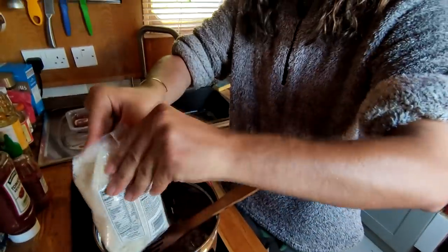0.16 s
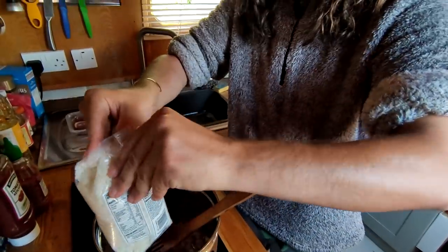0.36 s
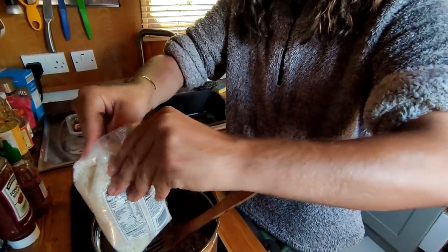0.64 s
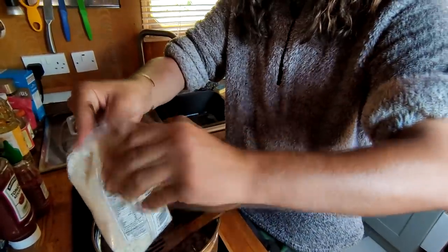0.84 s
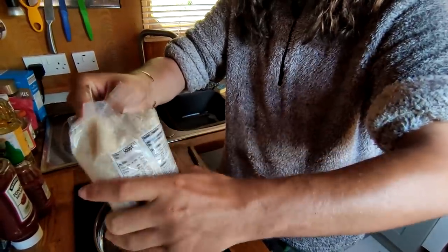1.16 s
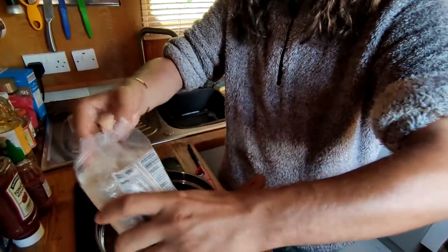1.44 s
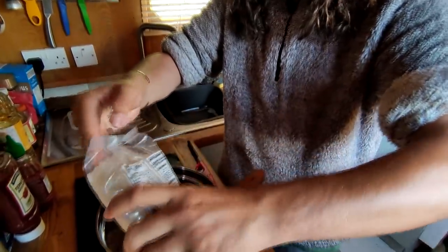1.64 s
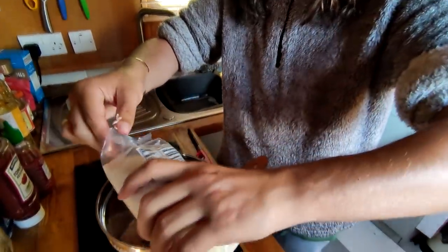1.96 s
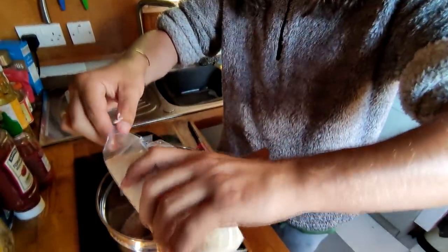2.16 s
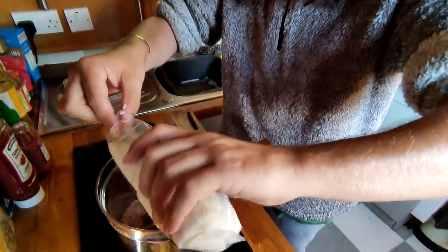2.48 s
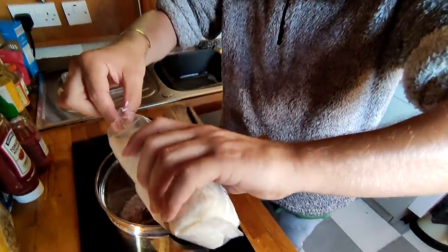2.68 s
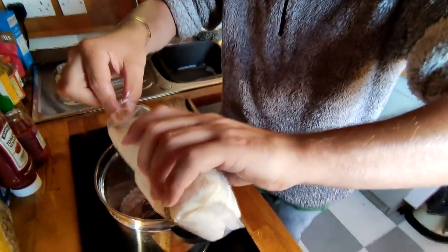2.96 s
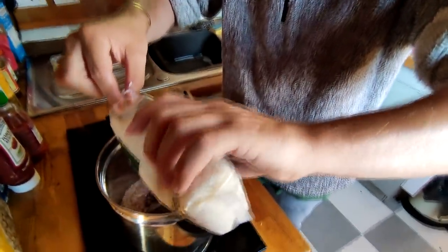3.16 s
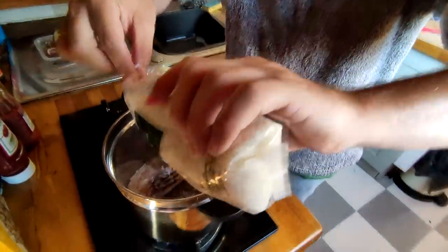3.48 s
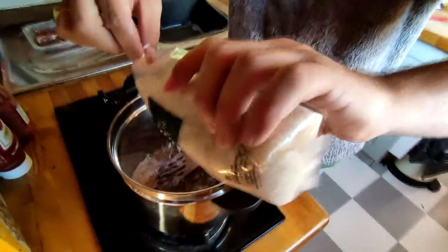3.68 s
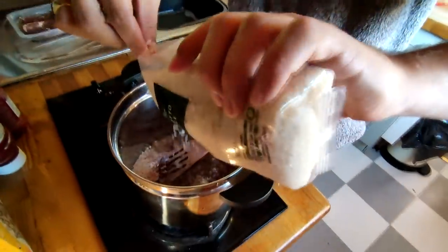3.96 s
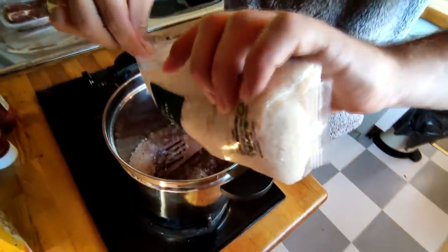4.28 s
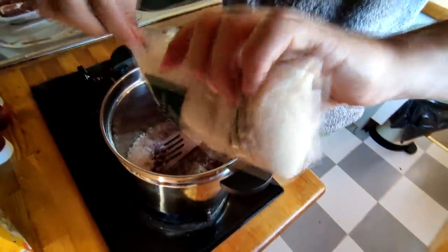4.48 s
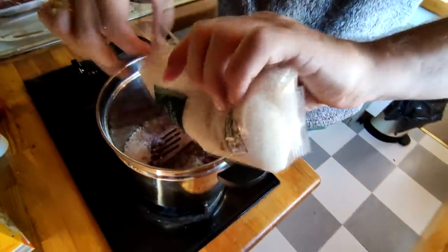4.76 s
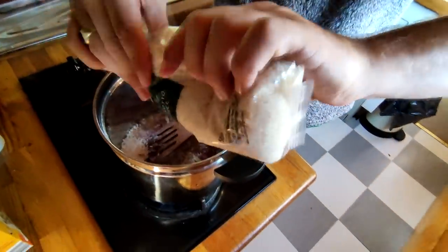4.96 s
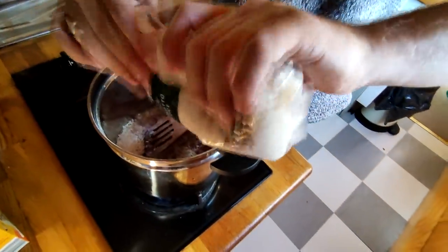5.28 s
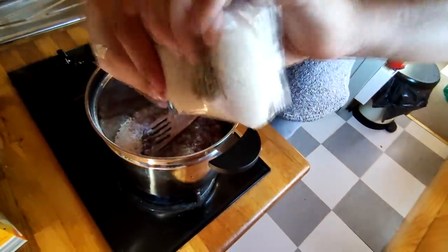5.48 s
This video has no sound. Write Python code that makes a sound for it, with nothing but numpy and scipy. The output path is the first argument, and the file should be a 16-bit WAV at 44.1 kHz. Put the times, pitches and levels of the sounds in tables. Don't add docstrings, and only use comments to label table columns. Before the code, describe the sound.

Dry rice is shaken from a crackling plastic bag into a ringing steel pot, pattering brightly over soft frying sizzle and extractor hum.

```python
import sys
import numpy as np
from scipy import signal
from scipy.fft import rfft, irfft
from scipy.io import wavfile
from scipy.ndimage import uniform_filter1d

SR = 44100
rng = np.random.default_rng(int(sys.argv[2]) if len(sys.argv) > 2 else 0)


def digitize_waveform(pressure):
    field = np.atleast_2d(pressure).T
    bounded = np.clip(field, -1, 1)
    quanta = np.round(bounded * 32767).astype(np.int16)
    wavfile.write(sys.argv[1], SR, quanta)


def invert_db(level):
    return 10 ** (np.asarray(level, dtype=float) / 20)


N = 247842

# frequency in Hz, level in dB per Hz.
KITCHEN_COLOUR = [(15, -56), (25, -15), (101, -4), (400, -3), (633, -12), (1540, -1), (3020, -3),
                  (3450, -10), (4640, -2), (5610, -43), (8170, -9.5), (11900, -2.5), (15600, -7.5)]
# frequency in Hz, likeness (1 is identical).
PORT_LIKENESS = [(60, 0.85), (180, 0.76), (550, 0.68), (1650, 0.44), (4970, -0.059), (15000, -0.2)]
# frequency in Hz, left in dB, right in dB.
PORT_SHADING = [(300, -1, 1), (1300, 1, -1), (2500, 1, -2), (4600, 5, 1), (6600, 7, -1), (7200, 0, -5),
                (8600, 8, 0), (9300, -3, -4), (9800, -3, 3), (10600, -9, 5), (11300, -10, 6),
                (11750, -2, 9), (14000, -5, 5), (15500, -4, 3)]
# start in seconds, peak in dB, pitch in Hz.
THUMPS = [(0.356, -25, 385), (1.183, -41, 380), (1.287, -30, 382), (1.68, -30.5, 410), (1.905, -32, 387),
          (3.169, -36.5, 358), (3.388, -34, 384), (3.516, -27, 368), (3.993, -35.5, 248), (4.72, -29, 238),
          (4.856, -25.5, 270), (5.111, -25, 390), (5.197, -22.5, 310), (5.348, -20, 362),
          (5.467, -25.5, 297), (5.494, -36, 228), (5.565, -21.5, 370)]
# frequency in Hz, level in dB per Hz.
FILM_COLOUR = [(100, -13.5), (330, -5), (520, -3), (1000, 3), (2500, -2), (4500, -6.5), (6000, -10.5),
               (10000, -29), (16000, -23)]
# time in seconds, rustle in dB.
HANDLING = [
    (0.0, -46),
    (0.43, -68),
    (0.93, -59),
    (1.42, -43),
    (1.54, -52.5),
    (1.96, -50),
    (2.61, -52),
    (3.41, -50),
    (4.03, -51.5),
]
# start in seconds, length in seconds, rustle in dB.
SQUEEZES = [
    (4.474, 0.11, -27.5),
    (4.644, 0.23, -37.5),
    (4.954, .25, -31),
    (5.273, 0.085, -29.5),
    (5.426, .2, -30.5),
]
# start in seconds, peak in dB, film pitch in Hz, crack in dB.
SHAKEN_CREASES = [(0.0362, -14.5, 3280, -29), (0.1628, -32, 1800, -9), (0.1963, -27, 1810, -5.5),
                  (0.2859, -37, 3040, 7), (0.327, -21, 1650, -22), (0.3563, -18.5, 1050, -19),
                  (0.382, -24, 1610, -25), (0.515, -27.5, 1290, -19), (0.6197, -25, 1930, -22),
                  (0.6572, -13, 1450, -11), (0.6646, -25.5, 1520, -23), (0.7909, -26.5, 2100, 0),
                  (0.8353, -28, 1630, -25), (0.9009, -24.5, 1300, -8), (1.184, -26, 383, -25),
                  (1.2053, -24.5, 980, 3), (1.238, -26, 960, -20), (1.2863, -18, 1400, -9),
                  (1.442, -15.5, 1230, -15), (1.5563, -22, 2700, -22), (1.5629, -24, 1430, -12),
                  (1.6803, -26.5, 960, -19), (1.7954, -39, 3070, -25), (2.1647, -26.5, 2190, -19),
                  (2.2635, -24, 3300, -15), (3.3766, -12.5, 3600, -6), (4.0998, -14, 3120, -21),
                  (4.3766, -21, 1540, -25)]
# start in seconds, peak in dB, film pitch in Hz, crack in dB.
SQUEEZED_CREASES = [(4.5887, -17, 1850, -2), (4.655, -24.5, 1910, -25), (4.691, -15, 3440, -9),
                    (4.722, -28, 1240, -23), (4.797, -26.5, 1590, 2), (4.829, -17.5, 2080, -16),
                    (4.9873, -22, 1330, -28), (4.9988, -18.5, 1870, -2), (5.03, -22, 2400, -5),
                    (5.0621, -4.5, 2080, -20), (5.0932, -25, 1950, -7), (5.1088, -7, 1130, -10),
                    (5.1343, -24, 645, -16), (5.158, -9.5, 2200, -5.5), (5.196, -17.5, 770, -34),
                    (5.219, -32.5, 1400, 17), (5.2884, -17, 1240, -31), (5.294, -16, 2200, -22),
                    (5.3096, -32, 2210, 1), (5.319, -23, 1750, -29), (5.3301, -8.5, 3360, -4),
                    (5.3941, -19, 1360, -10), (5.435, -13.5, 2440, -19), (5.469, -18, 820, -3),
                    (5.4955, -7, 2300, -12), (5.534, -15, 2400, -1), (5.5645, -14.5, 1570, 1),
                    (5.587, -22.5, 1520, 0)]
# time in seconds, patter in dB, left over right in dB.
POUR = [(0.0, -46.5, 5), (0.3, -48.5, 0.5), (0.47, -38.5, 2.5), (1.36, -40.5, 1.5), (1.83, -45.5, 0.5),
        (2.02, -46, -5), (2.25, -37.5, -0.5), (2.5, -42.5, 0), (2.8, -33, 1.5), (3.05, -30, -3),
        (3.22, -36, -1.5), (3.46, -33.5, -3.5), (3.77, -29.5, -0.5), (4.36, -33, -1), (4.44, -31.5, -1),
        (4.62, -49.5, 4.5), (4.91, -40.5, -1.5), (5.62, -38.5, -1)]
# start in seconds, peak in dB, dying time in seconds.
SHAKES = [(0.1042, -26, 0.063), (0.33, -11.5, 0.068), (0.3463, -10, 0.12), (0.45, -16, .067),
          (0.529, -13, 0.083), (0.5756, -10.5, 0.13), (0.7817, -14.5, 0.15), (0.8984, -19, .04),
          (0.908, -7, 0.039), (0.924, -11, 0.13), (1.0051, -13, 0.12), (1.1528, -23, .055),
          (1.1714, -16.5, 0.19), (1.1973, -20.5, 0.21), (1.257, -11.5, 0.11), (1.319, -11.5, 0.038),
          (1.3344, -13, 0.13), (1.4632, -15.5, 0.15), (1.605, -17.5, 0.076), (1.713, -19.5, 0.053),
          (1.7225, -17, 0.28), (1.941, -24.5, .06), (2.0743, -22.5, 0.33), (2.1124, -22.5, 0.27),
          (2.133, -20.5, 0.3), (2.1829, -11.5, .094), (2.305, -21, .06), (2.339, -15.5, 0.031),
          (2.3765, -20, 0.35), (2.4252, -18.5, .06)]
# start in seconds, peak in dB, dying time in seconds.
SURGES = [(2.5505, -18.5, 0.39), (2.5777, -15.5, 0.26), (2.628, -13.5, 0.27), (2.6554, -16, 0.4),
          (2.7422, -16.5, 0.15), (2.7944, -14.5, 0.049), (2.8985, -15.5, .066), (2.9283, -17, 0.026),
          (2.98, -15.5, 0.12), (3.0037, -13, 0.057), (3.0998, -16, 0.15), (3.1706, -12.5, 0.048),
          (3.2195, -15.5, 0.063), (3.3154, -18, 0.23), (3.531, -17, 0.056), (3.6017, -13.5, .067),
          (3.633, -13, 0.31), (3.767, -11.5, 0.051), (3.7984, -12.5, 0.15), (3.8447, -11.5, 0.059),
          (3.908, -13, .03), (4.0193, -19, 0.07), (4.0687, -13.5, 0.38), (4.1177, -11.5, 0.12),
          (4.19, -9, 0.073), (4.274, -22, 0.066), (4.34, -15, 0.061), (4.428, -16, 0.083),
          (4.4964, -13, .12), (4.6104, -20, 0.1)]
# time in seconds, peak in dB.
TICKS = [(0.023, -30), (0.16, -28), (0.227, -30), (0.2373, -22), (0.2524, -24), (0.285, -26), (0.2935, -29),
         (0.494, -21.5), (0.5474, -28), (0.6755, -40), (0.684, -34), (0.7332, -27), (0.7714, -29),
         (0.873, -21), (0.8875, -19), (1.1186, -43), (1.1348, -36), (1.2401, -21), (1.4421, -41),
         (1.5787, -24), (1.6568, -25), (1.778, -22), (1.9813, -18), (2.0238, -39), (3.3777, -38),
         (3.4967, -19), (4.5374, -16.5), (4.67, -29), (5.1, -31)]
# frequency in Hz, level in dB per Hz.
PATTER_COLOUR = [(700, -17), (1500, -15.5), (3500, -7.5), (4600, -9.5), (6000, -6), (7600, 1),
                 (10000, -2.5), (13000, -6.5), (16000, -7.5)]
# frequency in Hz, width in Hz, level in dB above the patter.
POT_MODES = [(2088, 135, 4.8), (3380, 49, 3.4), (3811, 214, 4.4), (4511, 104, 5.2), (4791, 45, 5.1),
             (5243, 116, 5.8), (5340, 29, 3.9), (5544, 94, 6.6), (6556, 24, 5.1), (6642, 165, 6.2),
             (7073, 50, 3.5), (7375, 110, 3.6), (8344, 120, 3.4), (8613, 89, 5.1), (9011, 143, 5.7),
             (10303, 81, 4.4), (11078, 143, 6.6), (11649, 77, 5.3), (11789, 61, 4.1), (12672, 61, 4.8),
             (12887, 51, 5.9), (13081, 65, 3.9), (13447, 68, 4.3), (13662, 40, 4.4), (14470, 103, 4.2),
             (14750, 54, 4.6), (14976, 60, 5.1), (15202, 58, 4.8), (15450, 51, 4.6), (15730, 75, 7.0)]

LEFT_LAG = 4


def rms_one(x):
    return x / np.sqrt(np.mean(x ** 2) + 1e-20)


def in_time(rows):
    s, *columns = np.transpose(rows)
    return [np.interp(np.arange(N) / SR, s, c) for c in columns]


def at_hz(points, hz, axis=1):
    points = np.array(points)
    return np.interp(np.log(np.maximum(hz, 1)), np.log(points[:, 0]), points[:, axis])


def drift(rate):
    r = np.exp(-40 * np.pi * rate / SR)
    noise = rng.standard_normal(N // 20 + 3002)
    slow = signal.lfilter([1], [1, -2 * r, r * r], noise)[3000:]
    return np.interp(np.arange(N) / 20, np.arange(len(slow)), rms_one(slow))


def colour(x, db_of_hz):
    log_response = db_of_hz(np.arange(2049) * SR / 4096) * np.log(10) / 20
    cepstrum = irfft(log_response)
    cepstrum[1:2048] *= 2
    cepstrum[2049:] = 0
    answer = irfft(np.exp(rfft(cepstrum)))
    return signal.oaconvolve(x, answer)[:len(x)]


def band(x, order, hz, kind):
    return signal.sosfilt(signal.butter(order, hz, kind, fs=SR, output="sos"), x)


def grains(per_s, uneven_db):
    sizes = rms_one(invert_db(uneven_db * np.minimum(rng.exponential(1, N), 4)))
    signs = rng.choice([-1, 1], N)
    chance = np.clip(per_s / SR, 1e-4, 1)
    return sizes * signs * (rng.random(N) < chance) / np.sqrt(chance)


def dying(t60, seconds=.3):
    return invert_db(-60 * np.arange(int(seconds * SR)) / SR / t60)


def ports(x, tail_db, t60):
    fade = dying(t60)
    hz = np.fft.rfftfreq(len(fade), 1 / SR)
    alike = np.clip(at_hz(PORT_LIKENESS, hz), 0, 1)
    shared = rfft(rng.standard_normal(len(fade)))
    out = []
    for lag in (LEFT_LAG, 0):
        own = rfft(rng.standard_normal(len(fade)))
        answer = irfft(np.sqrt(alike) * shared + np.sqrt(1 - alike) * own) * fade
        answer *= invert_db(tail_db) / np.sqrt(np.sum(answer ** 2))
        answer[lag] += 1
        answer /= np.sqrt(np.sum(answer ** 2))
        out.append(signal.oaconvolve(x, answer)[:N])
    return np.array(out)


def kitchen():
    hz = np.fft.rfftfreq(N, 1 / SR)
    alike = np.clip(at_hz(PORT_LIKENESS, hz), 0, 1)
    shared, *own = [rfft(grains(9000.0, uneven_db=6.0)) for source in range(3)]
    shared = shared * np.exp(-2j * np.pi * hz / SR * np.array([[LEFT_LAG], [0]]))
    fizz = np.sqrt(alike) * shared + np.sqrt(1 - alike) * np.array(own)
    fizz = irfft(fizz * invert_db(at_hz(KITCHEN_COLOUR, hz)), N)
    return invert_db(-39.5) * rms_one(fizz) * invert_db(4.7 * drift(3.7))


def thumps():
    out, t = np.zeros(N), np.arange(len(dying(1, seconds=.12))) / SR
    wobbles = np.cumsum(rng.standard_normal((len(THUMPS), len(t))), axis=1) * .11
    for (s, peak_db, hz), wobble in zip(THUMPS, wobbles):
        at = int(s * SR)
        swell = 1 - np.exp(-t / .0012)
        blow = np.sin(2 * np.pi * hz * t + wobble) * swell * invert_db(peak_db + 3 - 60 * t / .04)
        out[at:at + len(t)] += blow[:N - at]
    return ports(out, tail_db=-3.0, t60=.12)


def rustle():
    rise_s, fall_s, between_db = 0.041, 0.058, -44.0
    held_bright_db, squeezed_bright_db = 11, 4
    t, squeeze = np.arange(N) / SR, invert_db(between_db)
    for s, length, level_db in SQUEEZES:
        grip = np.interp(t - s, [0, rise_s, length, length + fall_s], [0, 1, 1, 0])
        squeeze = squeeze + invert_db(level_db) * grip
    closing = t > SQUEEZES[0][0]
    level = np.where(closing, squeeze, invert_db(in_time(HANDLING)[0]))
    bright_db = np.where(closing, squeezed_bright_db, held_bright_db)
    clicks = invert_db(2.27 * drift(26.0)) * grains(900.0 * invert_db(4.0 * drift(23.6)), uneven_db=7.0)
    part, out = rng.integers(0, 3, N), 0
    for k in range(3):
        film = colour(clicks * (part == k), lambda f: at_hz(FILM_COLOUR, f))
        film += (invert_db(bright_db) - 1) * band(film, 2, 2500, "high")
        out = out + ports(invert_db(6.5) * level * film, tail_db=5.5, t60=0.11)
    return out


def snaps():
    pan_at_1700_db, pan_db_per_octave, pan_scatter_db = 4.5, 2.5, 8
    out, t = np.zeros((2, N)), np.arange(len(dying(1, seconds=.03))) / SR
    creases = [*SHAKEN_CREASES, *SQUEEZED_CREASES]
    noise = rng.standard_normal((len(creases), len(t)))
    cracks = band(noise, 2, [3000, 12000], "band") * invert_db(-60 * t / 0.013)
    for (s, peak_db, hz, crack_db), crack, rough in zip(creases, cracks, noise[::-1]):
        pan_db = pan_at_1700_db + pan_db_per_octave * np.log2(hz / 1700) + pan_scatter_db * rough[0]
        fade = invert_db(-60 * t * hz / 7.15)
        thud = np.sin(2 * np.pi * hz * t) * (1 + 0.6 * rough) * fade
        sound = invert_db(peak_db + 5) * (thud + invert_db(crack_db) * crack / np.abs(crack).max())
        at = int(s * SR)
        panned = sound * invert_db(np.array([[pan_db], [-pan_db]]) / 2)
        out[:, at:at + len(t)] += panned[:, :N - at]
    film = band(out.mean(axis=0), 2, 150, "high")
    near = ports(film, tail_db=-2, t60=.024)
    room = ports(film, tail_db=20, t60=.3)
    balance = uniform_filter1d(out ** 2, size=1000) + 1e-9
    return (near + invert_db(-12) * room) * np.sqrt(balance / balance.mean(axis=0))


def pot_answer(scatter_db, scatter_t60, tail_db, tail_t60, ring_db, sharpness):
    t = np.arange(len(dying(1))) / SR
    answer = np.zeros(len(t))
    answer[rng.integers(0, 24)] = 1
    for level_db, t60 in ((scatter_db, scatter_t60), (tail_db, tail_t60)):
        echo = rng.standard_normal(len(t)) * dying(t60)
        answer += invert_db(level_db) * rms_one(echo) / np.sqrt(len(t))
    answer /= np.sqrt(np.sum(answer ** 2))
    for hz, width, level_db in POT_MODES:
        width = width / sharpness
        mode = np.sin(2 * np.pi * (hz * t + rng.random())) * np.exp(-np.pi * width * t)
        energy = np.pi * width / SR
        level = invert_db(ring_db + level_db + rng.normal(0, 4.0))
        answer += level * rms_one(mode) * np.sqrt(energy / len(t))
    return colour(answer, lambda f: at_hz(PATTER_COLOUR, f))


def rice_flow():
    lead_grains_db, lead_s = 6.0, .002
    bed_s, bed_dull_db = 3.56, -6
    power, bright = invert_db(2 * in_time(POUR)[0]), np.zeros(N)
    t = np.arange(len(dying(1))) / SR
    for clumps, spread in ((SHAKES, 0.004), (SURGES, 0.0077)):
        for s, peak_db, t60 in clumps:
            at = int(s * SR)
            fall_db = -60 * np.maximum(t - spread, 0) / max(t60, .01)
            lead_db = lead_grains_db * np.exp(-t / lead_s)
            shape = np.minimum(t / 0.00034, 1) * invert_db(fall_db + lead_db)
            shape = (invert_db(peak_db - 13.0) * shape[:N - at]) ** 2
            bright_db = 9.5 - 0.3164 * (peak_db + 27.5)
            power[at:at + len(t)] += shape
            bright[at:at + len(t)] += shape * (bright_db + bed_dull_db * (s > bed_s))
    return power, bright


def rice():
    power, bright = rice_flow()
    flow = np.sqrt(power) * invert_db(1.4 * drift(70.0))
    hits = flow * grains(4600.0 * np.sqrt(flow / .02), uneven_db=4.5)
    hits[[int(s * SR) for s, db in TICKS]] = invert_db(np.array(TICKS)[:, 1] + 10)
    nearby = rng.integers(0, 2, N)
    wander = np.round(3 * drift(5.0)).astype(int)
    spot = (nearby + wander) % 6
    out = np.zeros((2, N))
    for port in (0, 1):
        for k in range(6):
            answer = pot_answer(scatter_db=6.0, scatter_t60=.035, tail_db=3.0, tail_t60=.16,
                                ring_db=.5, sharpness=3.5)
            out[port] += signal.oaconvolve(hits * (spot == k), answer)[:N]
    lag = int(.001398 * SR)
    bounce = band(out, 1, [2500, 9000], "band")
    out[:, lag:] -= .65 * bounce[:, :-lag]
    out *= np.sqrt(np.mean(hits ** 2) / np.mean(out ** 2))
    out += (invert_db(bright / power) - 1) * band(out, 2, 9500, "high")
    pan_db = in_time(POUR)[1]
    return invert_db(2.0) * out * invert_db(np.array([pan_db, -pan_db]) / 2)


def scene():
    return rice() + snaps() + thumps() + rustle() + kitchen()


def band_limit(x):
    return signal.sosfilt(signal.butter(12, 16830, fs=SR, output="sos"), x)


def record(dry):
    def heard_db(hz, port):
        notch_db = 6.5 / (1 + (13.0 * (hz / 523 - 1)) ** 2)
        return at_hz(PORT_SHADING, hz, axis=port + 1) - notch_db

    shaded = np.array([colour(dry[port], lambda f: heard_db(f, port)) for port in (0, 1)])
    rounded = .9 * np.tanh(shaded / .9)
    top_cut = signal.ellip(10, .5, 70, 15720, fs=SR, output="sos")
    mix = band(signal.sosfilt(top_cut, rounded), 2, 45, "high")
    return band_limit(mix)


dry = scene()
out = record(dry)
digitize_waveform(out)
```